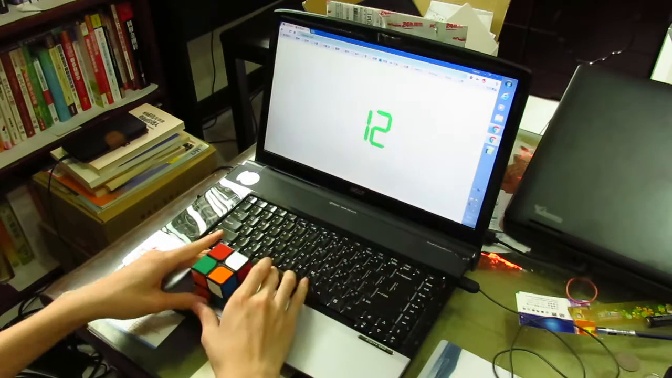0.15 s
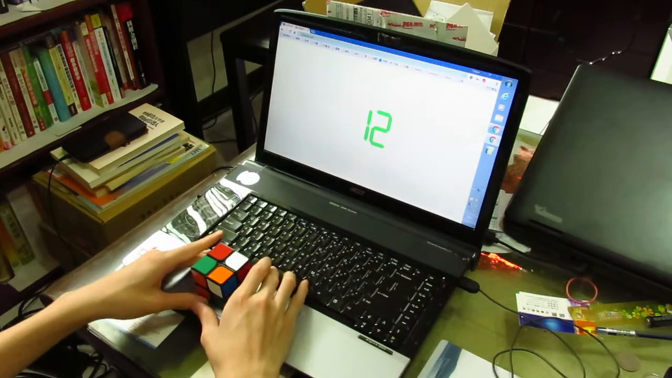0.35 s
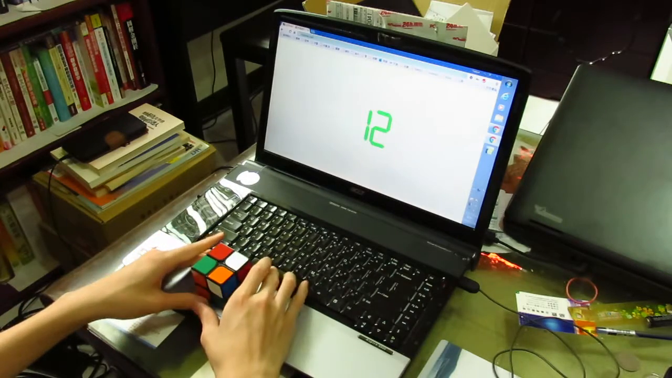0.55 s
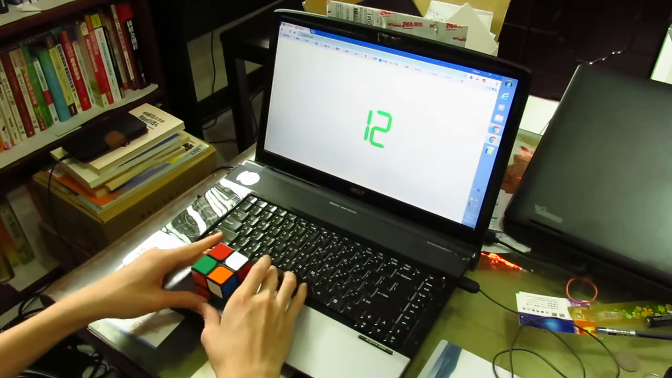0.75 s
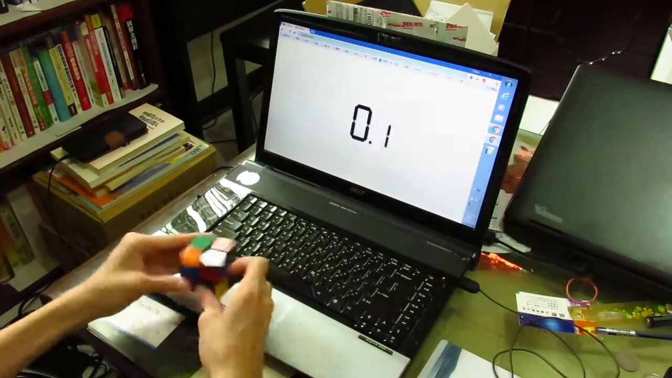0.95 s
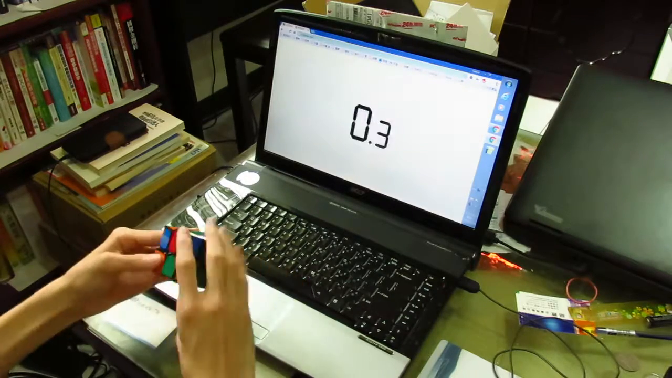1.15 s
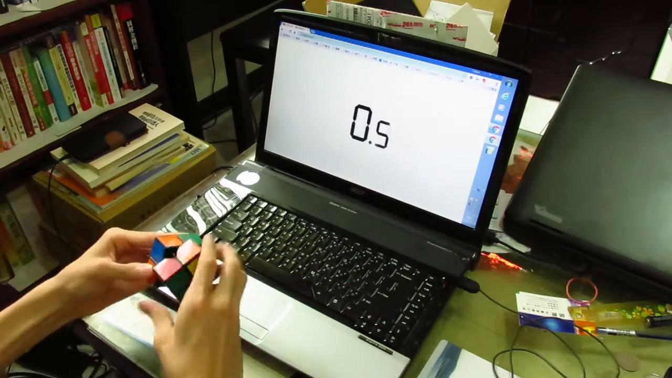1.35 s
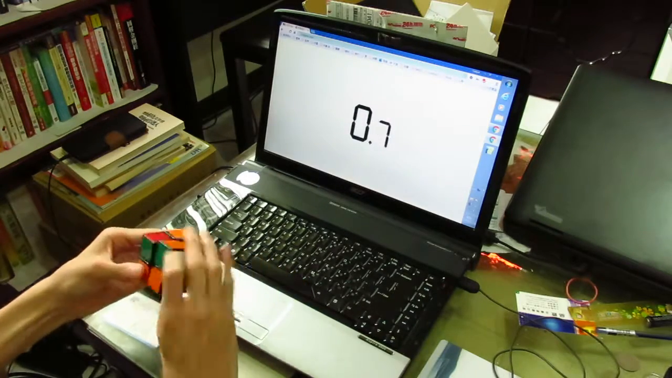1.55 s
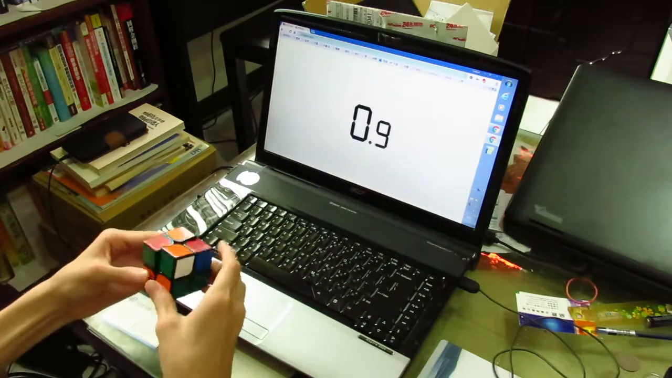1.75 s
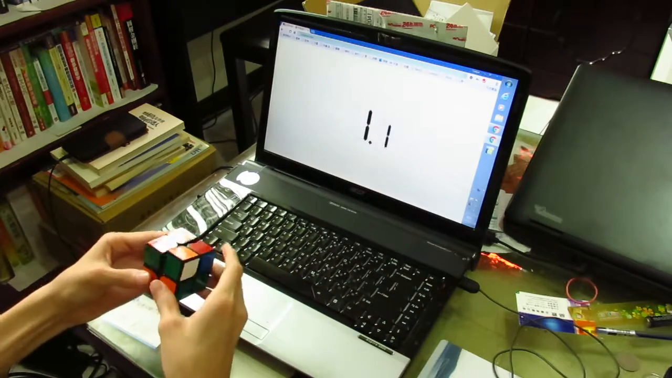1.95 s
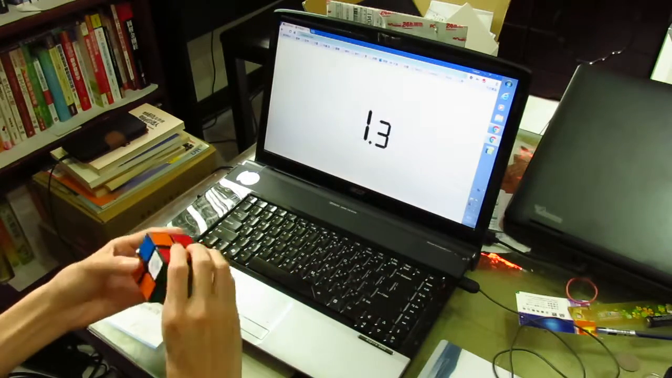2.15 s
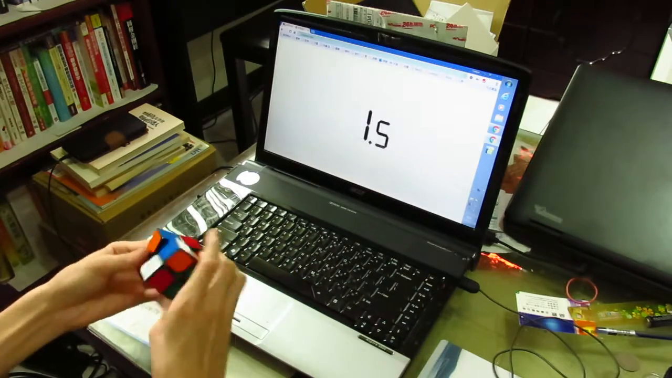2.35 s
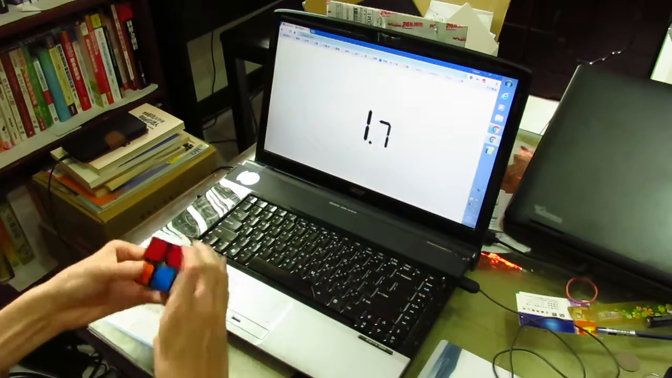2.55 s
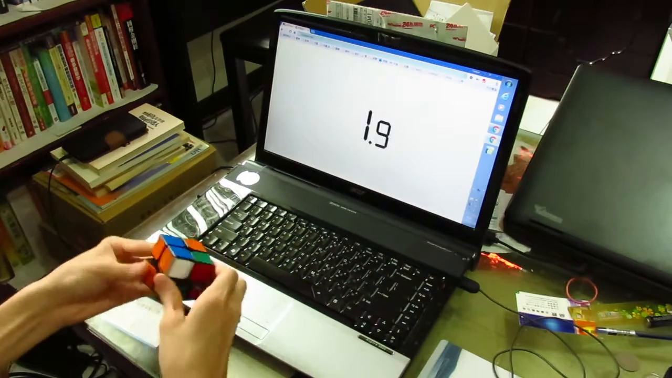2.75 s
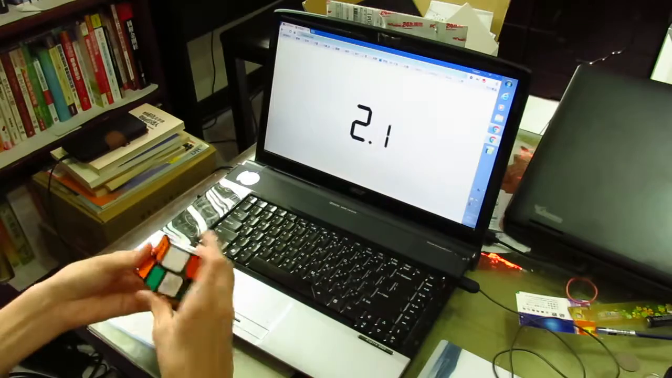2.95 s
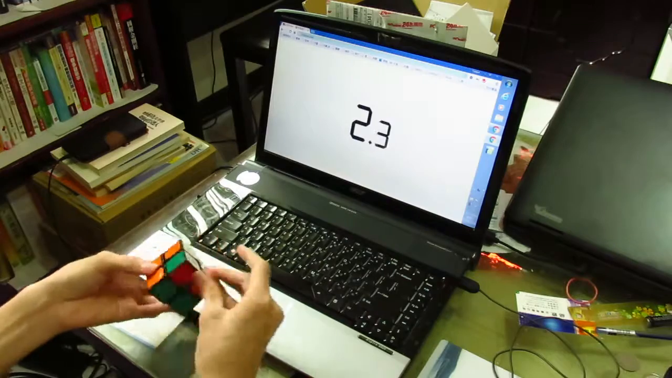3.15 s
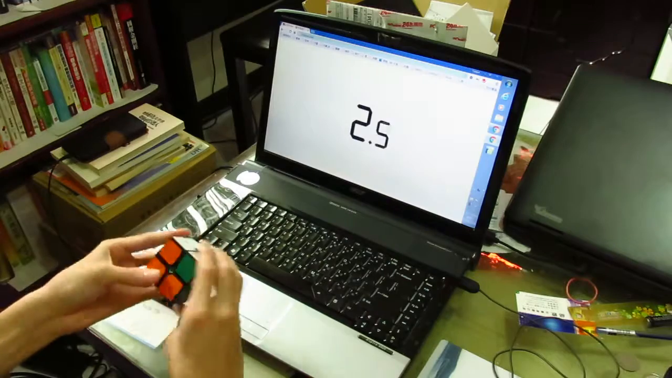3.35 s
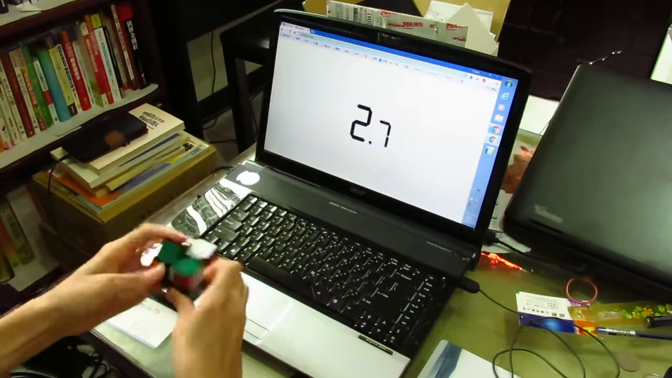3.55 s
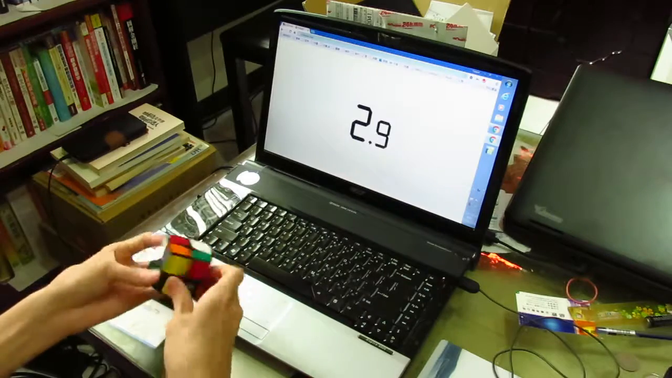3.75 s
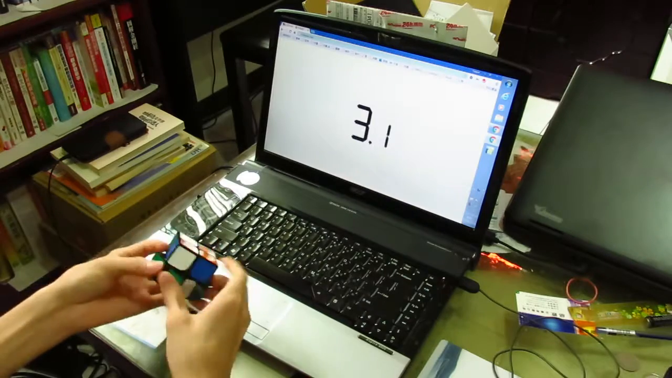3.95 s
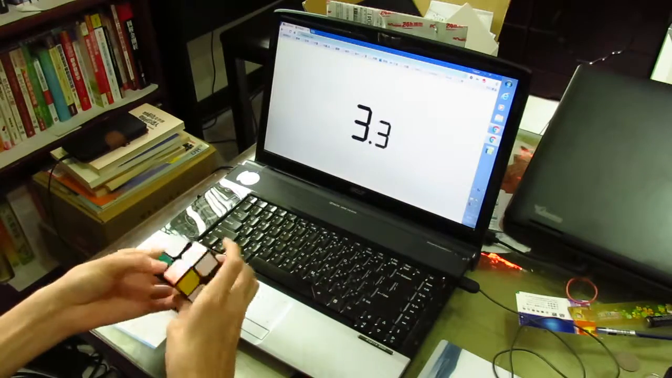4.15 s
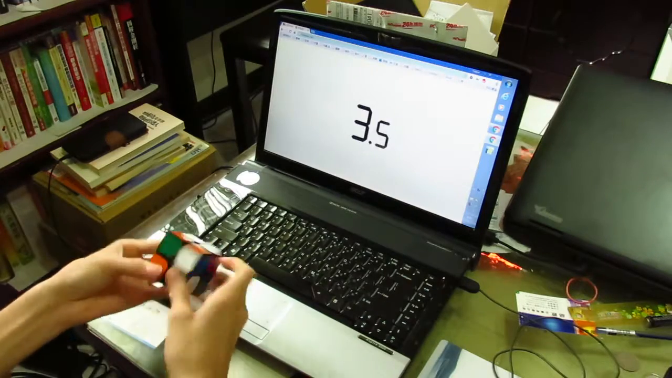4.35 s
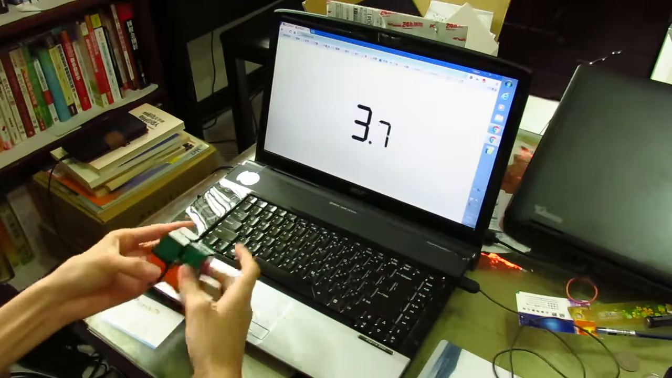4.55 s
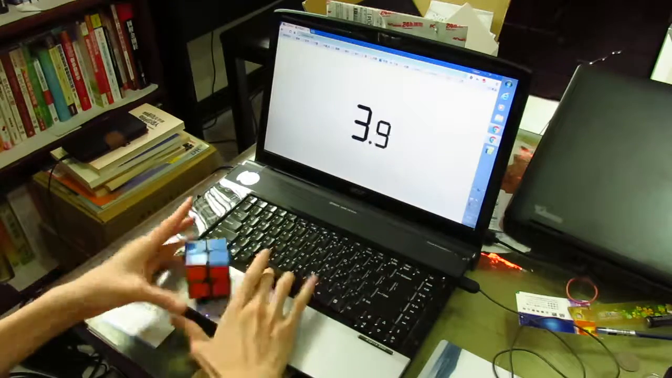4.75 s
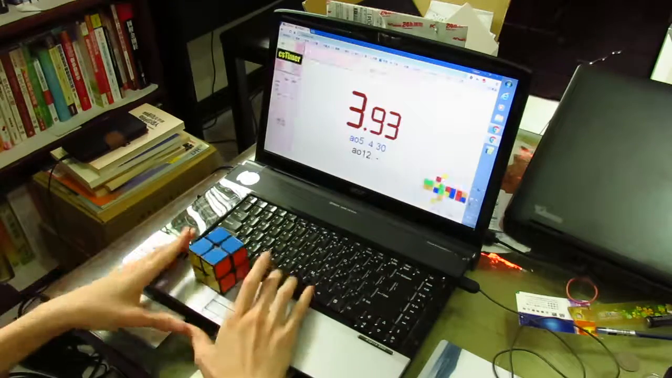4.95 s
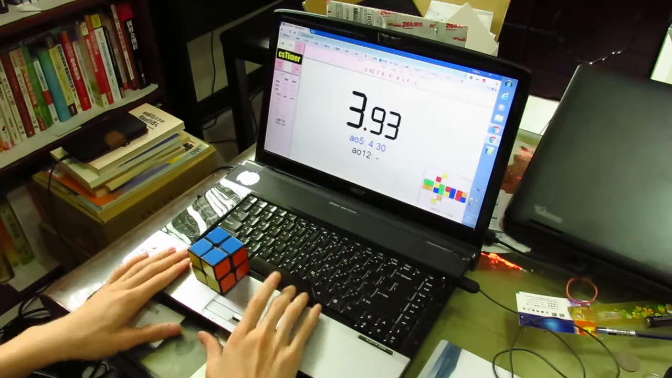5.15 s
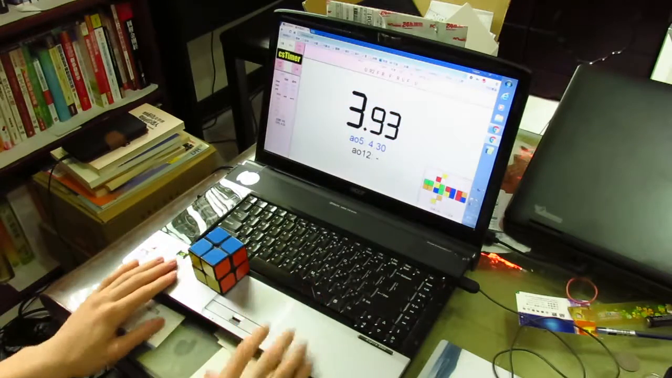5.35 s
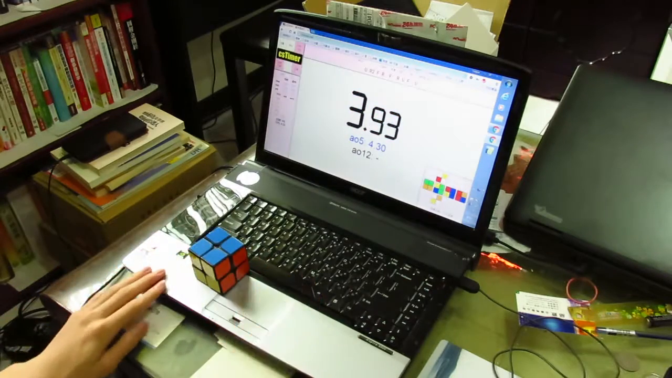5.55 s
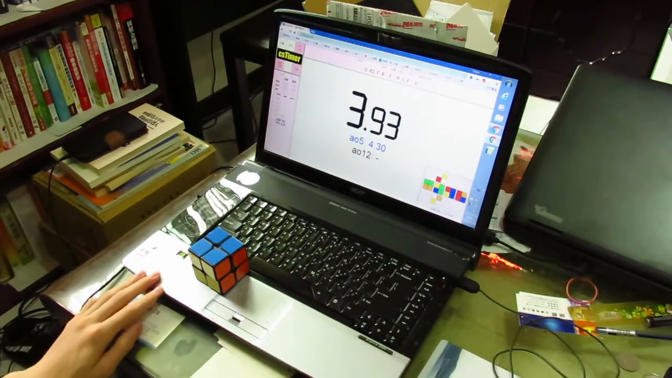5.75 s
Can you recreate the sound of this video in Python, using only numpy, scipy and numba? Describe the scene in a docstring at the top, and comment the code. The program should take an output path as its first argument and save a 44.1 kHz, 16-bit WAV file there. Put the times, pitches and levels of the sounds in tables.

```python
"""Over the steady rush and faint tones of a laptop fan in a small room, hands first bump softly and brush the case.
A small plastic twisty cube is picked up, handled and turned very fast: parts catch on each other as they slide,
and each click, a snap home or later a landing, chatters, rings the hollow pieces and cracks their thin walls.
The cube is dropped on the laptop and a hand slaps the keyboard, so case, keys and chassis sound; palms brush on.
A camera close by hears all this through two ports, and its limiter ducks at the highest peaks."""
import sys
import numpy as np
from scipy import signal
from scipy.fft import rfft, irfft
from scipy.io import wavfile
from scipy.ndimage import uniform_filter1d, minimum_filter1d
from numba import njit

SR = 44100
rng = np.random.default_rng(int(sys.argv[2]) if len(sys.argv) > 2 else 0)


def bounce(signal):
    """Save signal as a 16-bit WAV file at the path given by the first command-line argument."""
    frames = np.transpose(np.atleast_2d(signal))
    limited = np.clip(frames, -1, 1)
    pcm = np.round(limited * 32767).astype(np.int16)
    wavfile.write(sys.argv[1], SR, pcm)


N = 256215
TIME = np.arange(N) / SR
KNOCK_HZ = 1510  # usual pitch of the hollow pieces

# Spectrum of fan and room air. Each row: frequency in Hz, relative density in dB per Hz.
AIR_SPECTRUM = [(15, -32), (25, -3.5), (113, -4), (152, -4), (274, -9), (349, -6), (666, -8), (945, -9),
                (1490, -10.5), (1620, -12.5), (2060, -14.5), (3170, -20.5), (5580, -28.5), (13200, -46.5),
                (15500, -53.5)]
# Side of the air against its mid. Each row: frequency in Hz, side minus mid in dB.
AIR_SIDE = [(40, -10), (120, -3.5), (250, 5), (600, -1.5), (1300, -5.5), (3000, -7), (8000, -3), (15000, 5)]
# Tones of the fan. Each row: mean frequency in Hz, mean level in dB.
FAN_TONES = [(143, -58.5), (678, -59), (1357, -67), (1670, -64), (13001, -83)]
# Soft low bumps of hands and arms. Each row: start in seconds, level over 5 ms in dB, pitch in Hz.
HAND_BUMPS = [(0.485, -27, 103), (0.521, -34, 70), (.56, -32, 123), (0.571, -28.5, 55), (0.606, -34, 52),
              (0.689, -34, 54.6), (.925, -38, 105), (1.227, -32, 81), (1.296, -31.5, 78.93),
              (1.33, -42.5, 55), (5.02, -34, 150), (5.27, -37.5, 150), (5.37, -35, 150)]
# Palms brushing over the laptop. Each row: time of full pressure in seconds, length held in seconds,
# mean level in dB.
PALM_BRUSHES = [(.883, .04, -49), (5.02, 0.22, -54.5), (5.35, 0.087, -55.5), (5.52, .04, -47),
                (5.66, 0.16, -60)]
# A click of the cube: a layer or piece snapping home, or, from 4.803 to 4.816, the cube landing on the laptop.
# Each row: time in seconds, nominal level over 5 ms in dB before colouring,
# crack minus hollow knock in dB before colouring, knock pitch in Hz.
CUBE_CLICKS = [(.884, -37, 20, 1500), (.9896, -31, -6, 1180), (1.0213, -22.5, -1, 1640),
               (1.054, -21, -4, 1280), (1.188, -37, 5, 1460), (1.2598, -21.5, -6, 1410),
               (1.2874, -15, 0, 1443), (1.332, -16.5, -4, 1500), (1.4448, -29, 2, 1480),
               (1.4918, -28, 5, 1530), (1.5292, -17, 1.5, 1550), (1.545, -21, -15, 1610),
               (1.608, -18, -11, 1450), (1.6308, 0, -4, 1510), (2.1088, -28, 1, 1500),
               (2.1358, -12.5, 6, 1444), (2.1394, -13, -2.5, 1540), (2.24, -25, -7, 1470),
               (2.3087, -22.5, -1.5, 1400), (2.327, -22, 4, 1540), (2.3499, -22.5, -5.5, 1490),
               (2.455, -23, -4.5, 1580), (2.463, -25, -12, 1500), (2.5039, -20, -4, 1490),
               (2.5725, -8, -5, 1530), (2.5784, -11, -0.5, 1580), (2.5945, -15, 7, 1470),
               (2.606, -17, -3, 1450), (2.637, -20.5, 10, 1610), (2.6515, -23, -2, 1450),
               (2.7248, -21, -6, 1518), (2.773, -18, -7.5, 1523), (2.7817, -17.5, -12, 1504),
               (2.8615, -17, 3, 1510), (2.8687, -17, 0, 1440), (2.9115, -18, -7, 1476),
               (2.9666, -12.5, 7.5, 1520), (3.01, -21, 8, 1720), (3.024, -16.5, 3.5, 1435),
               (3.1009, -24, -10, 1540), (3.1705, -29, -2, 1500), (3.4099, -35, -1.5, 1454),
               (3.476, -27.5, -6, 1466), (3.5186, -19.5, -6, 1470), (3.5484, -15.5, 5, 1460),
               (3.6136, -15, 2.5, 1520), (3.6727, -5, 0, 1570), (3.685, -8.5, -2, 1422),
               (3.7397, -17, 4, 1530), (3.7587, -17, -2, 1580), (3.795, -12.5, 5, 1530),
               (3.802, -14, 5, 1590), (3.856, -15, -1, 1534), (3.8824, -9.5, -5.5, 1486),
               (3.9008, -20, 0, 1560), (3.9761, -17.5, -7, 1504), (4.05, -26, .5, 1440),
               (4.1235, -21, -1, 1500), (4.145, -20, -4, 1609), (4.1538, -3, 6.5, 1580),
               (4.3404, -21, -4.5, 1520), (4.4175, -20.5, -3, 1618), (4.4338, -20.5, -4, 1436),
               (4.475, -13.5, -8.5, 1510), (4.5135, -16.5, 1.5, 1390), (4.5437, -17.5, 1.5, 1520),
               (4.6117, -26, -7, 1532), (4.6989, -13.5, -8.5, 1640), (4.719, -17.5, 3.5, 1660),
               (4.803, -9, -8.5, 1412), (4.8118, -13, 10, 1410), (4.816, -12.5, 4, 1280),
               (5.5953, -35.5, -17, 1680)]
# Modes of a hollow piece. Each row: multiple of the knock pitch, level in dB, t60 in seconds.
PIECE_MODES = [(.63, -14, .014), (.78, -10, .018), (.92, -3, .019), (1.0, 0, .018), (1.08, 0, .019),
               (1.35, -14, .012)]
# Radiation of the knock; the small cube radiates little bass. Each row: frequency in Hz, gain in dB.
KNOCK_RADIATION = [(100, -44), (400, -32), (700, -15), (1050, -5), (1400, 1), (1650, 1.5), (2000, -4),
                   (5000, -6)]
# Crack of thin plastic walls. Each row: frequency in Hz, gain in dB.
WALL_CRACK = [(200, -40), (600, -19.5), (950, -8), (1550, -2.5), (2050, -1.5), (2700, -1), (3250, 0),
              (4000, -4), (5200, -8.5), (6500, -8), (7800, -13), (10000, -13), (13000, -15), (15500, -33)]
# Blows on the laptop. Each row: start in seconds, case level in dB, contact hardness in dB per octave,
# key rattle in dB, chassis thud in dB (levels over 5 ms).
LAPTOP_BLOWS = [(.911, -36, 1, -42, -52), (1.0508, -28, 1, -37, -48), (4.8037, -11, 9, -23, -44.5),
                (4.812, -13.5, 2.5, -11, -25), (4.8212, -29, -3, -12.5, -29), (4.8285, -19, 5, -16, -41.5),
                (4.8394, -16.5, -1, -16, -15.5), (4.9215, -13.5, -1, -12, -49), (4.932, -26, -4, -23, -47),
                (5.134, -36, -16, -48, -34)]
# Modes of the laptop case. Each row: frequency in Hz, level in dB, t60 in seconds.
CASE_MODES = [(191, -13.5, 0.13), (413, -10.5, 0.068), (566, -5, 0.042), (645, -8, 0.087),
              (870, -0.5, 0.044), (1058, 7, 0.019), (1180, 6.5, 0.023), (1238, 3, 0.036),
              (1390, -9.5, 0.13), (1790, 2.5, 0.014), (2136, -3.5, 0.021)]
# Rattling keys. Each row: frequency in Hz, gain in dB.
KEY_RATTLE = [(100, -11), (250, -1.5), (600, -3.5), (1000, 4), (1500, 1.5), (2500, -0.5), (6000, -9),
              (12000, -8), (15500, -21)]
# A layer sliding under the fingers, or, in the faintest rows, fingers handling the cube between turns.
# Each row: time of full pressure in seconds, length held in seconds, nominal pressure in dB.
CUBE_STROKES = [(.975, .035, -41), (1.024, 0.051, -32), (1.28, .045, -27.5), (1.526, .012, -20),
                (1.56, .06, -26.5), (2.135, .05, -27), (2.21, .06, -39), (2.318, 0.056, -31),
                (2.485, .075, -34), (2.585, 0.067, -23), (2.772, .02, -23), (2.865, .085, -26),
                (2.974, 0.065, -26.5), (3.095, .045, -29.5), (3.165, .03, -37), (3.42, .04, -42),
                (3.495, .075, -26.5), (3.61, 0.13, -25), (3.785, .045, -22.5), (3.87, .03, -25),
                (3.98, 0.083, -29.5), (4.125, .025, -26.5), (4.26, .07, -46), (4.35, .065, -28.5),
                (4.485, 0.088, -29.5), (4.61, .05, -36), (4.702, 0.024, -23.5)]
# Decay of the room. Each row: frequency in Hz, t60 in seconds.
ROOM_DECAY = [(125, 0.65), (500, 0.44), (1500, 0.48), (4000, 0.4), (8000, 0.42), (15000, 0.16)]
# Side of the room sound against its mid. Each row: frequency in Hz, side minus mid in dB.
ROOM_SIDE = [(100, -8), (600, -12), (1300, -12), (2500, -8), (4500, -4), (8000, -1), (15000, 0)]


def undb(db):
    """Logarithmic level: decibels to amplitude gain."""
    return 10 ** (np.asarray(db) / 20)


def unit(x):
    """Energy normalisation: scale the sum of squares to one."""
    return x / np.sqrt(np.sum(x ** 2) + 1e-18)


def hit_gain(db):
    """Energy as power times time: gain giving a unit-energy hit this level over 5 ms."""
    return undb(db) * np.sqrt(.005 * SR)


def along(points, hz):
    """Interpolation on a log-frequency axis between (Hz, value) points."""
    f, v = np.transpose(points)
    return np.interp(np.log(np.maximum(hz, 1)), np.log(f), v)


def colour(x, points):
    """Minimum-phase filtering: the folded cepstrum of a (Hz, dB) log gain gives a causal response."""
    size = 4096
    log_gain = np.log(undb(along(points, np.fft.rfftfreq(size, 1 / SR))))
    cepstrum = irfft(log_gain)
    cepstrum[1:size // 2] *= 2
    cepstrum[size // 2 + 1:] = 0
    response = irfft(np.exp(rfft(cepstrum)))
    return signal.fftconvolve(x, response)[:len(x)]


def fade(t60, size):
    """Exponential decay: amplitude falls by 60 dB in t60 seconds."""
    return np.exp(-np.log(1000) * np.arange(size) / SR / max(t60, 1e-4))


def ring(modes, size, detune=0.0079):
    """Modal superposition: damped sines of alternating sign, weighted and shifted a little at each contact."""
    t = np.arange(size) / SR
    chance = rng.standard_normal((len(modes), 2))
    weights = undb(2.5 * chance[:, 0]) * (-1) ** np.arange(len(modes))
    total = np.zeros(size)
    for (hz, db, t60), weight, shift in zip(modes, weights, chance[:, 1]):
        sine = np.sin(2 * np.pi * hz * (1 + detune * shift) * t)
        total += weight * undb(db) * fade(t60, size) * sine
    return total


def add(track, s, sound):
    """Linear superposition: mix a sound in at time s."""
    i = max(int(s * SR), 0)
    track[i:i + len(sound)] += sound[:N - i]


def walk(rate):
    """Slow random fluctuation: smoothed chance steps with a spread near one."""
    k = int(SR / rate)
    steps = np.repeat(rng.standard_normal(N // k + 1), k)
    return uniform_filter1d(steps, k)[:N]


def stereo(mid, side):
    """Sum and difference: left and right from mid and side."""
    return np.array([mid + side, mid - side])


def strokes(rows, attack_s, release_s, sag_db_per_s=0.):
    """Friction envelope: pressure rises before each start, holds with a slight sag and dies away."""
    power = np.zeros(N)
    for s, length, db in rows:
        t = TIME - s
        rise = np.exp(np.clip(t / attack_s, -20, 0))
        fall = np.exp(-np.log(1000) * np.clip((t - length) / release_s, 0, 2))
        power += (rise * fall * undb(db - sag_db_per_s * np.clip(t, 0, length))) ** 2
    return np.sqrt(power)


def air_rush():
    """Broadband flow noise: coloured noise whose level wavers slightly about its mean."""
    mean_db = -43.5
    noise = colour(rng.standard_normal(N), AIR_SPECTRUM)
    return np.sqrt(N) * unit(noise) * undb(mean_db + 0.2 * walk(11))


def fan():
    """Flow noise with tones: a steady rush of air carries a few tones wavering in pitch and level."""
    mid, side = air_rush(), air_rush()
    tones = np.zeros(N)
    for hz, db in FAN_TONES:
        level = np.sqrt(2) * undb(db + 2 * walk(4.98))
        phase = 2 * np.pi * np.cumsum(hz + 2.45 * walk(12)) / SR
        tones += level * np.sin(phase)
    return stereo(mid + tones, colour(side, AIR_SIDE))


def hands(size=8192):
    """Soft impact and skin friction: flesh gives dull, irregular bumps and skin hisses over the case."""
    bumps = np.zeros(N)
    for s, db, hz in HAND_BUMPS:
        dull = [(hz / 3, -14), (hz, 0), (hz * 1.6, -13), (hz * 4, -40), (hz * 12, -75), (hz * 40, -100)]
        noise = rng.standard_normal(size) * fade(0.105, size)
        add(bumps, s, hit_gain(db) * unit(colour(noise, dull)))
    skin = colour(rng.standard_normal(N), [(200, -12), (1500, 19.5), (5000, 11.0), (13000, 1.0), (16000, -9)])
    # attack: time constant of touching down; release: time to fall by 60 dB
    pressure = strokes(PALM_BRUSHES, attack_s=.01, release_s=0.4)
    return bumps + np.sqrt(N) * unit(skin) * pressure * undb(2 * walk(50))


def hollow(hz, size):
    """Modal scaling: one cube piece rings at fixed multiples of its knock pitch."""
    return ring([(hz * ratio, db, t60) for ratio, db, t60 in PIECE_MODES], size)


def chatter(length, size, lead, count=6):
    """Repeated contact: edges scrape ever harder up to one firm contact, with weaker ones around it."""
    push, chance = np.zeros(size), rng.random((count, 2))
    when = (np.arange(count) + chance[:, 0]) / count
    places = np.clip(lead + when * length * SR, 0, size - 1).astype(int)
    push[places] = (0.17 + 0.33 * chance[:, 1]) * rng.choice([-1, 1], count)
    firm = int(np.clip(lead + 0.2887 * length * SR, 1, size - 1))
    push[firm] = 1
    # reversed decay: the scrape swells towards the firm contact
    scrape = (rng.standard_normal(firm) * fade(.006 + 2.5 * abs(length), firm))[::-1]
    push[:firm] += undb(-5.0) * unit(scrape)
    return push


def clicks(ticks, size=1536):
    """Impact excitation: chattering contacts knock the hollow pieces and crack their thin walls."""
    chatter_s, firm_db, halving_db = .0044, -10, 7  # above the firm level each step halves the chatter
    grind_s_per_db = .00012  # the more a click cracks, the longer its edges grind
    knocks, cracks, lead = np.zeros(N), np.zeros(N), size // 4
    burst = fade(0.013, size) - fade(0.0032, size)  # the walls take a moment to start shaking
    for s, db, crack_db, hz in CUBE_CLICKS + ticks:
        shorten = .5 ** (max(db - firm_db, 0) / halving_db)
        length = (chatter_s + grind_s_per_db * crack_db) * shorten
        push = chatter(max(length, 0), size, lead)
        knock = signal.fftconvolve(push, hollow(hz, size))[:size]
        crack_power = np.abs(signal.fftconvolve(push ** 2, burst ** 2)[:size])
        crack = rng.standard_normal(size) * np.sqrt(crack_power)
        gain = hit_gain(db) / np.hypot(1, undb(crack_db))  # knock and crack share the energy
        add(knocks, s - lead / SR, gain * unit(knock))
        add(cracks, s - lead / SR, gain * undb(crack_db) * unit(crack))
    return undb(-1.1) * colour(knocks, KNOCK_RADIATION) + undb(8.4) * colour(cracks, WALL_CRACK)


def laptop(size=12288):
    """Modal impact: blows ring the case (lower under soft flesh), rattle keys and thud the chassis on its feet."""
    out, t = np.zeros(N), np.arange(size) / SR
    thud = unit(np.sin(2 * np.pi * 122 * t) * (fade(0.1, size) - fade(0.077, size)))
    rattle = fade(0.0053, size) - fade(0.0025, size) + 0.031 * fade(0.077, size)
    for s, case_db, hardness, keys_db, thud_db in LAPTOP_BLOWS:
        # hardness tilts the mode levels about 1 kHz
        modes = [(hz, db + hardness * np.log2(hz / 1000), t60) for hz, db, t60 in CASE_MODES]
        case = unit(ring(modes, size, detune=0.021))
        keys = unit(colour(rng.standard_normal(size) * rattle, KEY_RATTLE))
        add(out, s, hit_gain(case_db) * case + hit_gain(keys_db) * keys + hit_gain(thud_db) * thud)
    return out


def slide(count=6, size=1024):
    """Stick-slip friction: turning or handling gives a stream of tiny clicks, grittier under more pressure."""
    # attack: time constant of taking hold; release: time to fall by 60 dB;
    # sag: the stroke loses pressure as it goes on
    pressure = strokes(CUBE_STROKES, attack_s=.014, release_s=.18, sag_db_per_s=19)
    db = 20 * np.log10(pressure + 1e-6)
    grit_db = 3.6 + 0.18 * (db + 30.5)
    body, catch_power = np.zeros(N), np.zeros(N)
    for _ in range(count):
        catches, where = np.zeros(N), rng.integers(0, N, size=800)
        strength = undb(2.4 * np.minimum(rng.exponential(size=len(where)), 3))
        catches[where] = strength * rng.choice([-1, 1], len(where))
        piece = hollow(KNOCK_HZ * (1 + .04 * rng.standard_normal()), size)
        body += signal.oaconvolve(catches, piece)[:N]
        catch_power += catches ** 2
    burst = fade(0.0041, size) - fade(0.00075, size)
    grit_power = np.abs(signal.oaconvolve(catch_power, burst ** 2)[:N])
    grit = rng.standard_normal(N) * np.sqrt(grit_power)
    mix = unit(colour(body, KNOCK_RADIATION)) + undb(grit_db) * unit(colour(grit, WALL_CRACK))
    return undb(db - 9.0) * np.sqrt(N) * mix


def loose_ticks():
    """Random impacts: loose pieces tick faintly in each stroke, as rows of (s, dB, crack dB, Hz)."""
    rate_per_s, loudest_db = 30, 1  # loudest tick relative to the stroke's listed pressure
    ticks = []
    for s, length, db in CUBE_STROKES:
        chance = rng.random((8, 4))
        when = (np.arange(len(chance)) + chance[:, 0]) / rate_per_s
        for w, (_, a, b, c) in zip(when, chance):
            if w < length:
                hz = KNOCK_HZ * (1 + .12 * (c - .5))
                ticks.append((s + w, db + loudest_db - 6 * a, 3 - 12 * b, hz))
    return ticks


def tail(size=24576):
    """Reverberation: quick reflections from desk and screen, then diffuse decay at a rate set per octave."""
    t, hz = np.arange(size) / SR, np.fft.rfftfreq(size, 1 / SR)
    centres = 125 * 2. ** np.arange(8)
    spectrum = rfft(rng.standard_normal(size))
    decay = np.zeros(size)
    for centre in centres:
        band = np.interp(np.log2(hz + 1), np.log2(centres), centres == centre)
        decay += irfft(spectrum * band) * fade(along(ROOM_DECAY, centre), size)
    # stronger early part, starting after 3 ms
    decay *= (1 + 2.43 * fade(0.058, size)) * np.clip((t - .003) / 0.0034, 0, 1)
    return colour(unit(decay), [(150, -1.5), (700, 6.0), (1500, -1.5), (4000, 0.5), (9000, -1.5), (15000, 2.5)])


def reverberate(outward, wet_db=-5.5):
    """Diffuse field: each direction's sound returns through its own independent tail."""
    returns = sum(signal.oaconvolve(x, tail())[:N] for x in outward)
    return undb(wet_db) * returns / np.sqrt(len(outward))


def room(direct, outward, size=512):
    """Direct and reverberant field: both ports hear the source, and other directions return from the room."""
    mid, side = reverberate(outward), reverberate(outward)
    # the camera body scatters the treble differently into each port
    scatter = unit(rng.standard_normal(size) * (fade(.006, size) - fade(.002, size)))
    scatter = colour(scatter, [(200, -22), (1400, -22), (4000, -14), (8000, -8), (15000, -4)])
    scattered = signal.oaconvolve(direct, scatter)[:N]
    return stereo(direct + mid, colour(side, ROOM_SIDE) + scattered)


def scene(count=4):
    """Directivity: every direction gets its own mix of each hit, in the room and over the fan."""
    air, rubbing, ticks = fan(), slide() + hands(), loose_ticks()
    direct, *outward = (laptop() + clicks(ticks) + rubbing for _ in range(count + 1))
    return room(direct, outward) + air


@njit
def held_peak(x, top, release):
    """Peak following: jumps up at once and sinks slowly back to the threshold."""
    out, e = np.empty(len(x)), top
    for i in range(len(x)):
        e = max(x[i], e * release, top)
        out[i] = e
    return out


def record(dry):
    """Band limiting and peak limiting: the camera cuts deep bass, ducks at peaks and cuts the top."""
    x = signal.sosfilt(signal.butter(4, 30, "high", fs=SR, output="sos"), dry)
    top, recovery_db_per_s, cutoff_hz = .93, 18, 16100
    peak = held_peak(np.abs(x).max(axis=0), float(top), float(undb(-recovery_db_per_s / SR)))
    gain = uniform_filter1d(minimum_filter1d(top / peak, size=45), size=45)  # smooth over about 1 ms
    return signal.sosfilt(signal.ellip(8, .2, 80, cutoff_hz, fs=SR, output="sos"), x * gain)


dry = scene()
out = record(dry)
bounce(out)
```